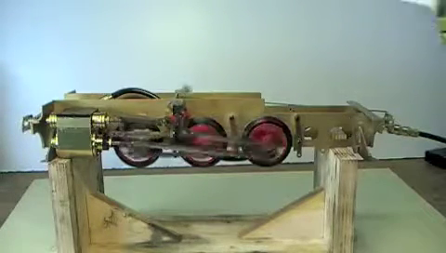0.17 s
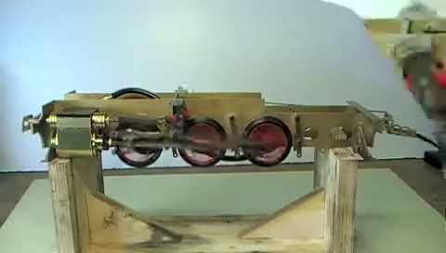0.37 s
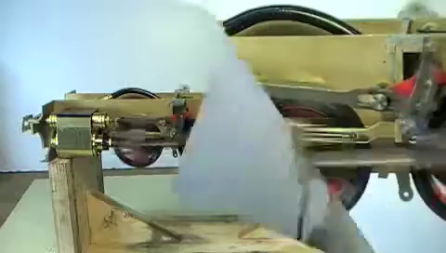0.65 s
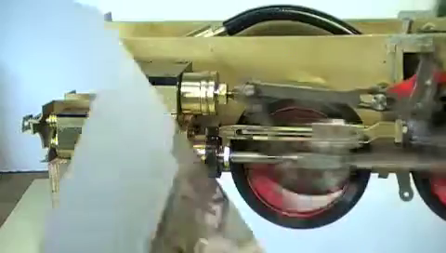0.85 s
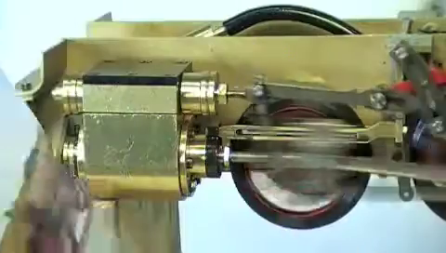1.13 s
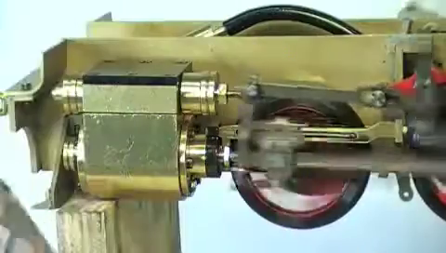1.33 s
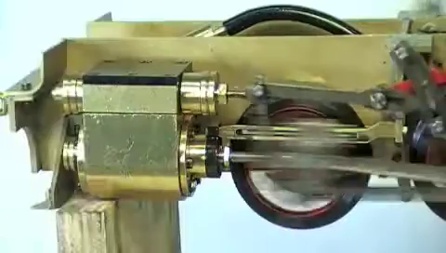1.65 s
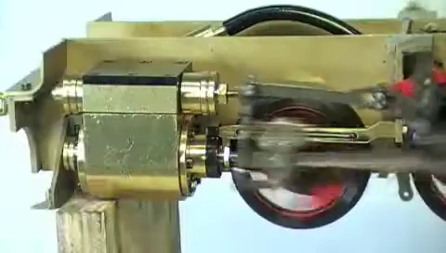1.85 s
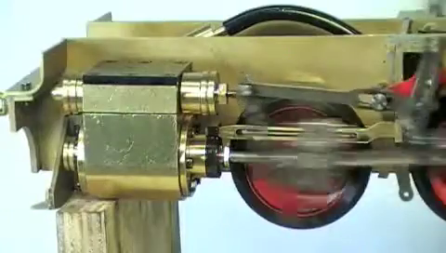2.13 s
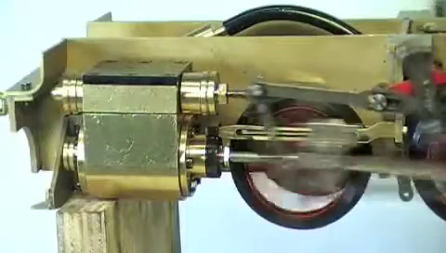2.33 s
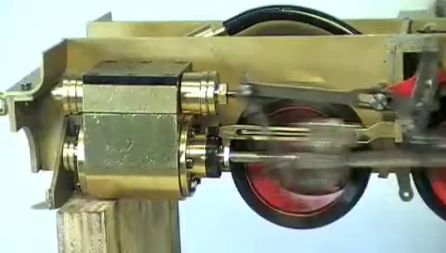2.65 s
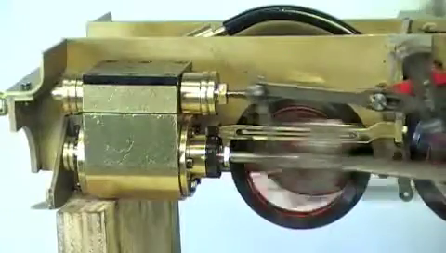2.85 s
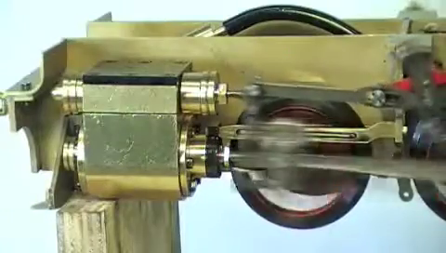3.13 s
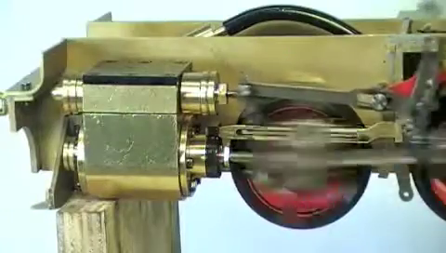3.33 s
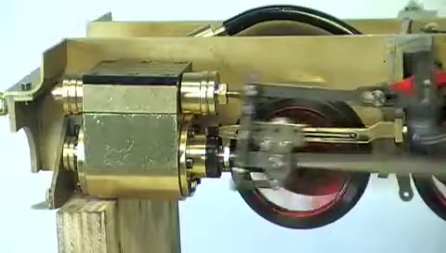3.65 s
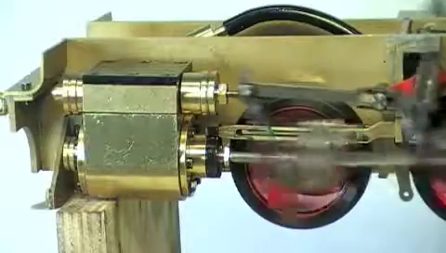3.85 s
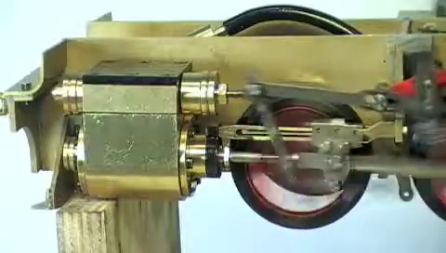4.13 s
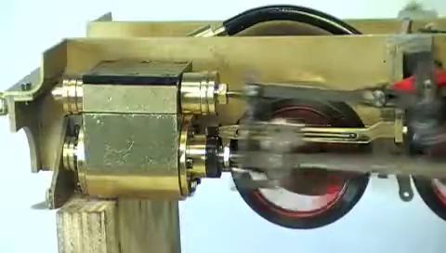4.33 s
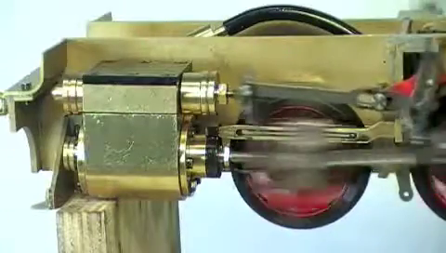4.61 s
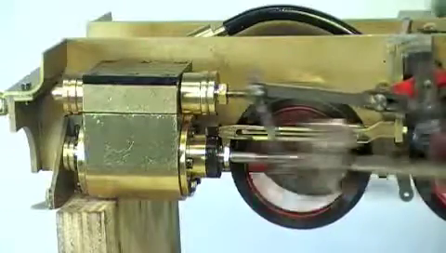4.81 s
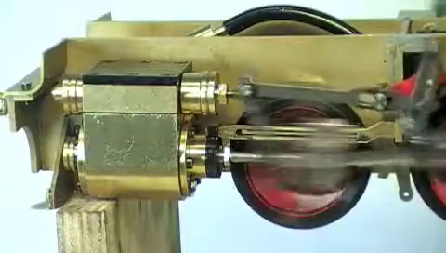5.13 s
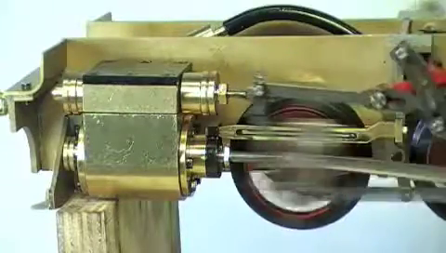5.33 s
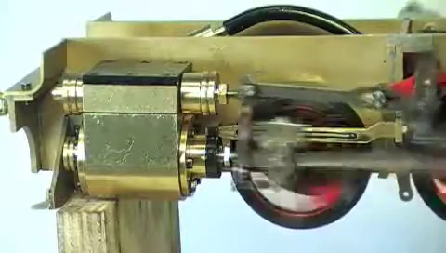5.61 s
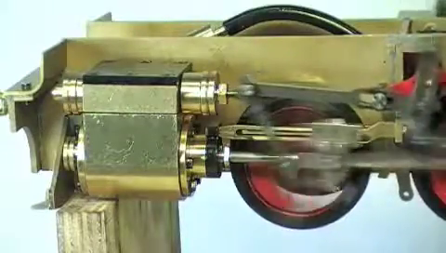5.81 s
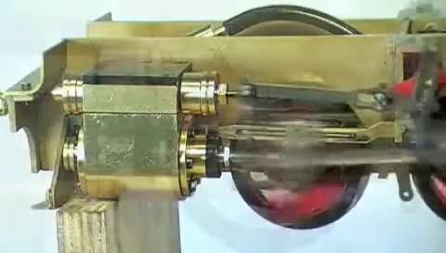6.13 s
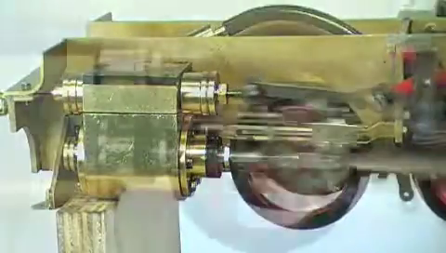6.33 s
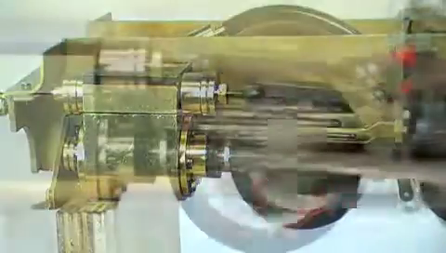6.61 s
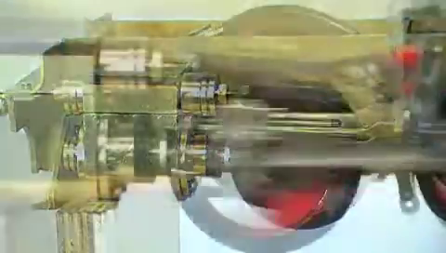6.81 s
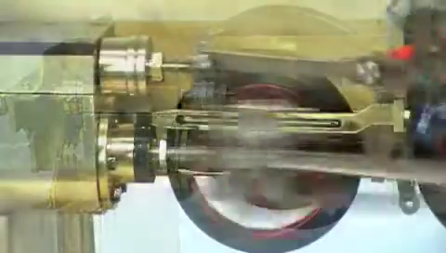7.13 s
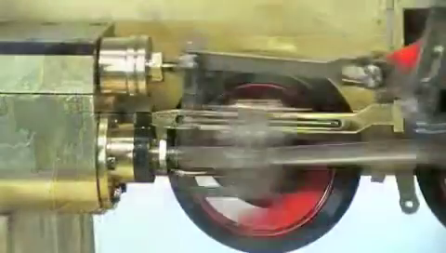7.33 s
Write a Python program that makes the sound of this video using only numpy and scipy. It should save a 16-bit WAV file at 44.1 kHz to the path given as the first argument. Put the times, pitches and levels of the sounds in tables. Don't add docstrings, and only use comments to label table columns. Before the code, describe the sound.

A model locomotive chassis spins its wheels on a wooden stand, driven by compressed air. About thirteen turns a second, dull knocks blur into a low woody hum while rods and valve gear clack and tick brightly. Quick exhaust puffs chop a steady hiss. The running never stops; soft fades move to other close views, the middle one with more stand resonance. Small indoor room, close camera microphone, faint short reverberation.

```python
import sys
import numpy as np
from scipy import signal
from scipy.fft import rfft, irfft, next_fast_len
from scipy.io import wavfile

SR = 44100
rng = np.random.default_rng(int(sys.argv[2]) if len(sys.argv) > 2 else 0)


def volts_from_db(level):
    exponent = np.asarray(level, float) / 20
    return 10 ** exponent


def to_wav(sig):
    pcm = np.clip(np.atleast_2d(sig), -1, 1) * 32767
    pcm = np.round(pcm).astype(np.int16)
    wavfile.write(sys.argv[1], SR, pcm.T)


N = 328986

# start in seconds, end in seconds.
FADES = [
    (0.0, 1.72),
    (5.7, 7.8),
]
# overall level, chassis level, stand level, level of the stand's
# upper ring and crosshead slack, all in dB.
VIEWS = [
    (0.3, -1.5, -7.0, -35, 3.4),
    (0.1, -0.1, 0.1, -52, 1.5),
    (0.2, -1.6, -1.6, -46, 3.7),
]
# time in seconds, turns per second.
WHEEL_SPEED = [
    [(-.3097, 13.6612), (2.3, 13.6612)],
    [(-.0867, 13.543), (1.3, 13.3747), (3.1, 13.3832), (4.5, 13.246), (5.9, 13.1804), (7.8, 13.1486)],
    [(5.2849, 13.3145), (7.7, 13.3145)],
]

KNOCKS = [
    [(.0589, -.0079), (.3278, -.007), (.4942, .0048), (.5674, .0073), (.7273, .0041)],
    [(.1607, -.0061), (.3486, .0117), (.4469, .0133), (.6365, .0055)],
    [(.0643, .012), (.2885, -.0134), (.3443, .0173), (.5324, .0138), (.894, -.0148)],
    [(.2663, -.0207), (.457, -.0155), (.6541, .021)],
    [(.1302, -.0148), (.4601, -.0249), (.9314, -.029)],
]
# frequency in Hz, t60 in seconds, level in dB.
BENCH_MODES = [(39.9, 0.148, -15.4), (85.4, 0.2, -6.4), (110.2, 0.155, -0.6), (146.8, 0.16, -5.4),
               (187.3, 0.119, -6.7), (231.0, 0.018, 3.4)]
STAND_MODES = [(302.4, 0.038, 10.1), (360.3, 0.3, 2.7), (415.2, 0.12, -18.9)]
FRAME_MODES = [(508.9, 0.057, 0.4), (568.8, 0.055, 1.7), (636.5, 0.09, -0.5)]
PLATE_MODES = [(758.6, 0.127, 0.9), (815.5, 0.14, -4.8), (864.8, 0.08, -1.5), (994.2, 0.1, -3.3)]
BLOCK_MODES = [(754, 0.036, 3), (807, 0.035, 0.5), (325, 0.047, -4), (984, 0.14, -9)]
# frequency in Hz, t60 in seconds, place in turns, level in dB.
DRONE = (267.5, .5, .8336, -33)
# frequency in Hz, t60 in seconds.
UPPER_DRONE = (288, 0.17)

# place on the wheel in turns (0-1), level in dB.
CLACKS = [
    [(.108, -6.5), (.30, -1.5), (.37, -5.5), (.60, -11.5), (.70, -9), (.86, -4), (.995, -4)],
    [(.071, -1.5), (.30, -13), (.37, -2.5), (.49, -8.5), (.70, -10), (.86, -5), (.97, -25.5)],
    [(.071, -4.5), (.37, 1.5), (.49, -7), (.70, -2.5), (.79, -7), (.86, 1.5)],
    [(.071, -8), (.30, 0), (.49, -1.5), (.86, -1), (.99, 4)],
    [(.04, -6), (.30, -2.5), (.38, 19), (.72, 21), (.86, -9)],
    [(.071, -7), (.108, 0), (.37, 10), (.49, 5), (.60, -1), (.70, 8.5), (.79, -30), (.86, 7), (.995, 0)],
]
# frequency in Hz, t60 in seconds, level in dB.
ROD_MODES = [(1246, 0.038, 12), (1404, 0.014, 22.5), (1490, 0.0028, -9), (1970, 0.0074, -23)]
CROSSHEAD_MODES = [(2380, 0.054, 2.5), (2480, 0.027, 10.5), (2540, 0.018, 6), (3000, 0.035, -8)]
SLIDE_MODES = [(3000, 0.015, 11.5), (3248, 0.014, 16), (3510, 0.06, 2), (3780, 0.026, -1.5),
               (3926, 0.066, -4.5)]
VALVE_MODES = [(7670, 0.0072, 1), (7530, 0.0056, 6)]
LEVER_MODES = [(6190, 0.0092, 20), (5700, 0.023, -0.46), (6650, .01, -2)]
LINK_MODES = [(8370, 0.02, 10.5), (8390, 0.02, 9), (8570, 0.025, -9), (7500, .012, -20),
              (10600, 0.032, 3.5), (12820, 0.018, 3)]
PART_LEVELS = (-38, -38, -34, -35, -44, -35)

# place on the wheel in turns (0-1), level in dB, decay in seconds.
PUFFS = [
    (0.03, 0.5, 0.0071),
    (0.288, -2.5, 0.0055),
    (0.373, 1, 0.0078),
    (0.589, -1, 0.0017),
    (.70, 3, 0.0075),
    (0.797, -1, 0.018),
]
# frequency in Hz, spectral density in dB per Hz.
AIR_COLOUR = [(450, -15.5), (1300, -15.5), (3300, -12.5), (4400, -15.5), (8700, -14.5), (9100, -20),
              (10900, -19), (11700, -35)]
# frequency in Hz, difference in dB.
LEAN = [(60, -2.5), (200, 2.5), (700, 1.3), (2380, .4), (4400, -1.5), (15000, 1.8)]
# frequency in Hz, level in dB.
WALLS = [(130, -22), (300, -21), (600, -18), (1290, -14), (2380, -12.5), (4400, -14), (8120, -9.5),
         (12000, -11.5)]


def level(x, db):
    return x * volts_from_db(db) / np.sqrt(np.mean(x ** 2))


def colour(x, points):
    hz, db = np.transpose(points)
    log_hz = np.log(np.arange(len(x) // 2 + 1) * SR / len(x) + 1)
    gain = volts_from_db(np.interp(log_hz, np.log(hz + 1), db))
    return irfft(rfft(x) * gain, len(x))


def cut_bass(x, order, hz):
    return signal.sosfilt(signal.butter(order, hz, "high", fs=SR, output="sos"), x)


def ring(force, modes):
    out = 0
    for hz, t60, db in modes:
        pole = np.exp(2j * np.pi * hz / SR - np.log(1000) / (t60 * SR))
        denominator = [1, -2 * pole.real, abs(pole) ** 2]
        out = out + volts_from_db(db) * signal.lfilter([.5, 0, -.5], denominator, force)
    return out


def fall(x, decay_s):
    return signal.lfilter([1], [1, -np.exp(-1 / (decay_s * SR))], x)


def strikes(turns, size, places, forces, jitter_s, scatter_db):
    s, count = np.transpose(turns)
    turn = np.arange(count[-1])[:, None] + places
    at = np.interp(turn, count, s - s[0]) + jitter_s * rng.standard_normal(turn.shape)
    sample = (at.clip(0) * SR).astype(int).ravel()
    trains = np.zeros((forces.shape[1], size))
    for train, column in zip(trains, forces.T):
        force = column * volts_from_db(scatter_db * rng.standard_normal(turn.shape))
        train += np.bincount(sample, force.ravel(), size)[:size]
    return trains


def knocks(turns, size, upper_db):
    bodies = []
    for table, modes in zip(KNOCKS, (BENCH_MODES, STAND_MODES, FRAME_MODES, PLATE_MODES, BLOCK_MODES)):
        table = np.array(table)
        force = strikes(turns, size, table[:, 0], table[:, 1:], jitter_s=.00006, scatter_db=.3)[0]
        bodies.append(ring(force, modes))
    bench, stand, frame, plate, block = bodies
    hz, t60, place, db = DRONE
    push = strikes(turns, size, np.array([place]), np.ones((1, 1)), jitter_s=.00002, scatter_db=.2)[0]
    drone = 0
    for mode in [(hz, t60, db), (*UPPER_DRONE, upper_db)]:
        drone = drone + ring(push, [mode]) * np.log(1000) * .098 / mode[1]
    soft = signal.butter(2, 3000, fs=SR, output="sos")
    return signal.sosfilt(soft, [bench + frame + plate + block, stand, drone])


def clacks(turns, size, slack_db, rattle_s=0.0026, grain_db=1.5, shared=0.71, hit=3.7):
    def grit():
        return rng.standard_normal(size) * volts_from_db(grain_db * rng.exponential(size=size).clip(0, 3))

    part_modes = (ROD_MODES, CROSSHEAD_MODES, SLIDE_MODES, VALVE_MODES, LEVER_MODES, LINK_MODES)
    slack = (0, slack_db, 0, 0, 0, 0)
    common, out = grit(), 0
    for table, modes, db, extra_db in zip(CLACKS, part_modes, PART_LEVELS, slack):
        table = np.array(table)
        blow = strikes(turns, size, table[:, 0], volts_from_db(table[:, 1:]), jitter_s=.0003, scatter_db=1.3)[0]
        rattle = fall(blow, rattle_s) * (shared * common + (1 - shared) * grit())
        out = out + level(ring(hit * blow + rattle, modes), db) * volts_from_db(extra_db)
    return cut_bass(out, 4, 1000)


def air(turns, size, rise_s=0.0011, flutter_db=0.5, flutter_s=0.0018):
    def hiss():
        return colour(rng.standard_normal(size), AIR_COLOUR)

    places, puff_db, decays_s = np.array(PUFFS).T
    opens = strikes(turns, size, places, np.diag(volts_from_db(puff_db)), jitter_s=.0005, scatter_db=1.5)
    flow = fall(sum(fall(train, decay_s) for train, decay_s in zip(opens, decays_s)), rise_s)
    flutter = level(fall(rng.standard_normal(size), flutter_s), 0) * flutter_db
    puffs = level(flow * hiss(), -28.5)
    leak = level(volts_from_db(flutter) * hiss(), -33)
    return cut_bass(puffs + leak, 4, 400)


def chassis_run(speed, level_db, body_db, stand_db, upper_db, slack_db):
    s, rate = np.transpose(speed)
    start = int(s[0] * SR)
    size = next_fast_len(int(s[-1] * SR) - start)
    t = (start + np.arange(size)) / SR
    rate = np.interp(t, s, rate)
    turns = np.c_[t, np.cumsum(rate) / SR][::64]
    faster = rate - rate.mean()
    body, stand, drone = knocks(turns, size, upper_db)
    knock_gain, slack_db = volts_from_db(3.5 * faster), slack_db - 23 * faster
    run = knock_gain * (volts_from_db(body_db) * body + volts_from_db(stand_db) * stand) + volts_from_db(stand_db) * drone
    run = run + clacks(turns, size, slack_db) + air(turns, size)
    line = np.zeros(N + SR)
    part = run[max(-start, 0):][:len(line) - max(start, 0)]
    line[max(start, 0):][:len(part)] = part
    return volts_from_db(level_db) * line


def ports(x):
    hz, db = np.transpose(LEAN)
    bass_lead = .6
    lead = bass_lead * 60 / np.maximum(np.arange(N // 2 + 1) * SR / N, 40)
    sides = []
    for side in (1, -1):
        spectrum = rfft(colour(x, np.c_[hz, side * db / 2]))
        sides.append(irfft(spectrum * np.exp(.5j * side * lead), N))
    return np.array(sides)


def room(x):
    t60_s, alike = .3, .4
    t = np.arange(int(t60_s * SR)) / SR
    wash = rng.standard_normal((2, len(t))) * volts_from_db(-60 * t / t60_s) * (t > .002)
    wash = wash / np.sqrt(np.sum(wash ** 2, axis=1, keepdims=True))
    mid, side = signal.fftconvolve(colour(x, WALLS)[None], wash, axes=1)[:, :N]
    return alike * mid + np.array([side, -side])


def scene():
    wide, close, closest = (chassis_run(speed, *gains) for speed, gains in zip(WHEEL_SPEED, VIEWS))
    close = np.delete(close, int(4.045 * SR) + np.arange(1024))
    first, second = (np.interp(np.arange(N) / SR, fade, (0, 1)) for fade in FADES)
    mix = (1 - first) * wide[:N] + (first - second) * close[:N] + second * closest[:N]
    return ports(mix) + room(mix)


def band_limit(x):
    return signal.sosfilt(signal.butter(12, 15700, fs=SR, output="sos"), x)


def record(dry):
    trimmed = cut_bass(dry, 4, 36)
    steep = signal.ellip(12, .5, 80, 13650, fs=SR, output="sos")
    return band_limit(signal.sosfilt(steep, trimmed))


dry = scene()
out = record(dry)
to_wav(out)
```